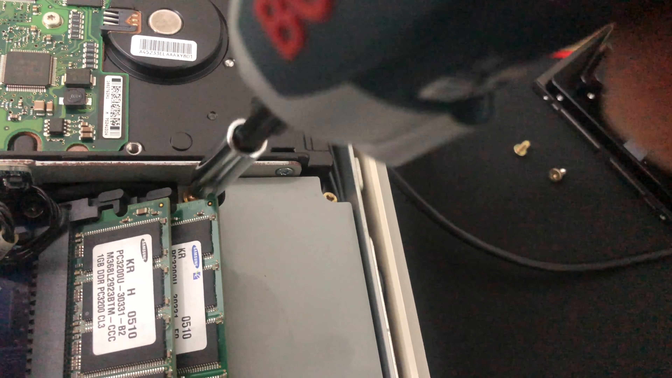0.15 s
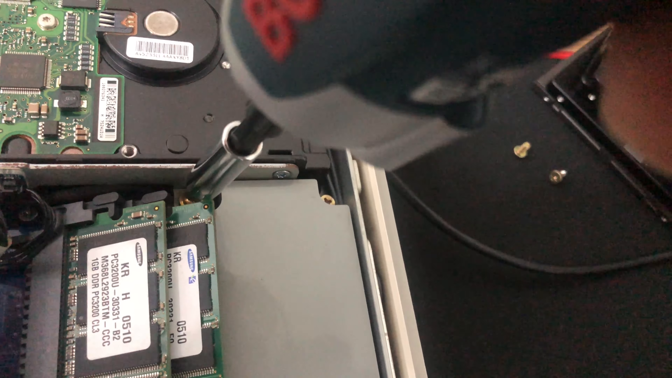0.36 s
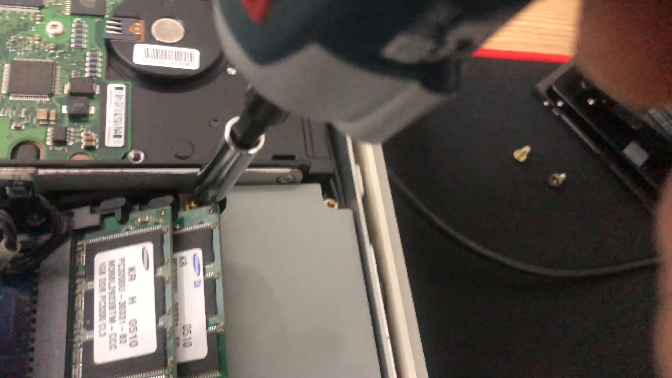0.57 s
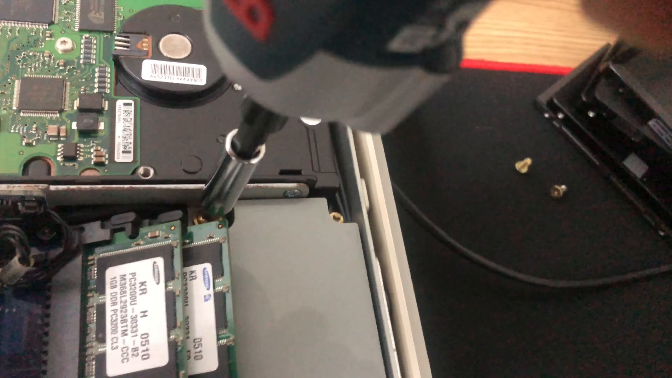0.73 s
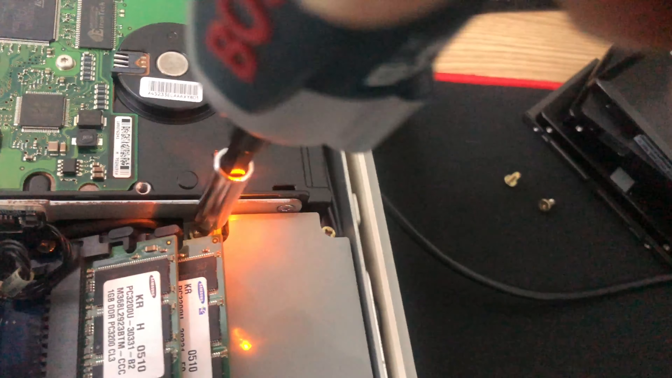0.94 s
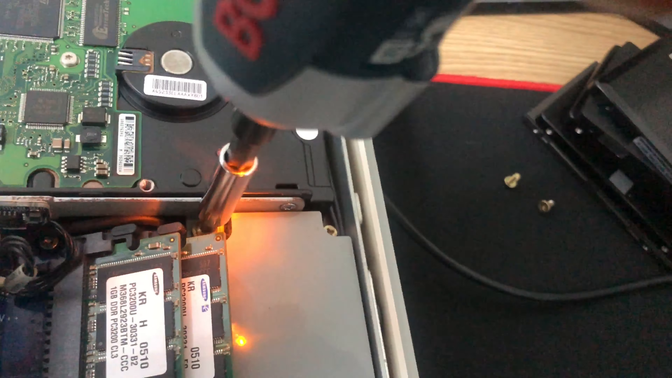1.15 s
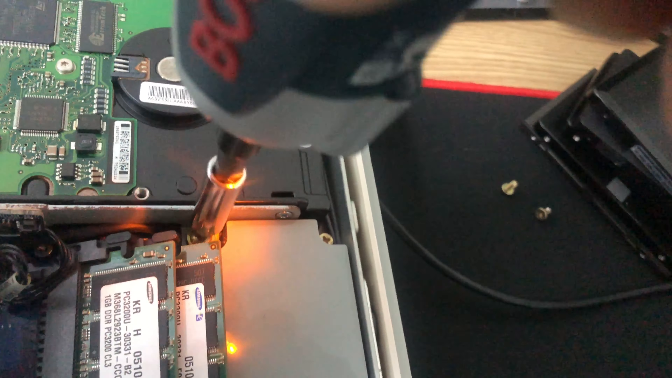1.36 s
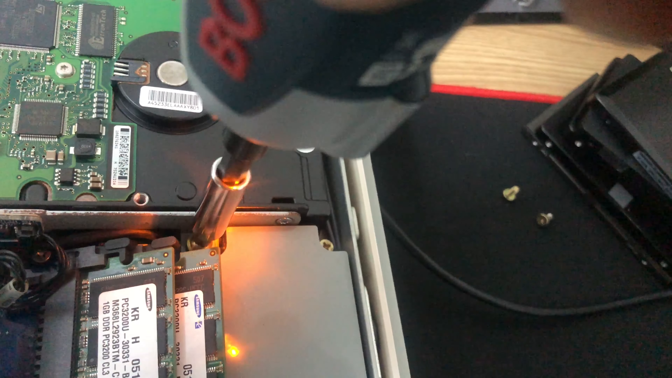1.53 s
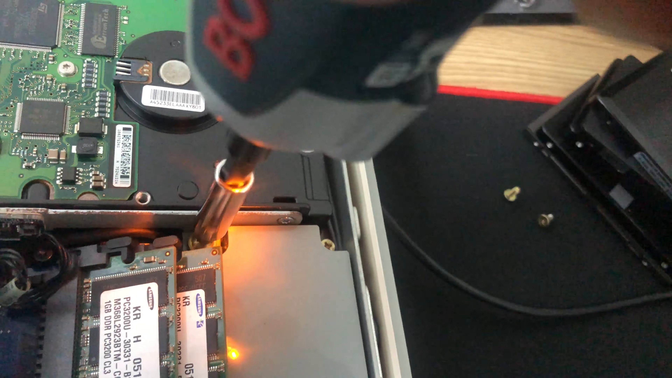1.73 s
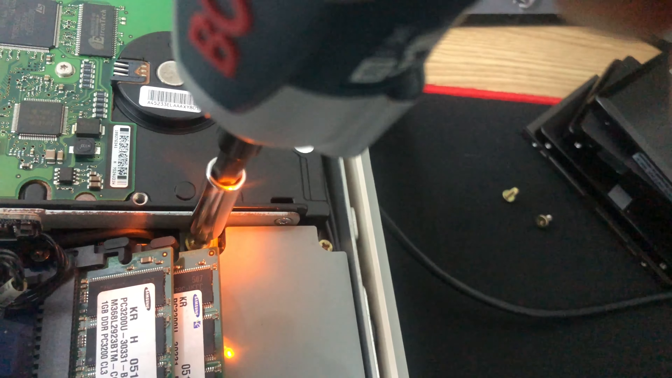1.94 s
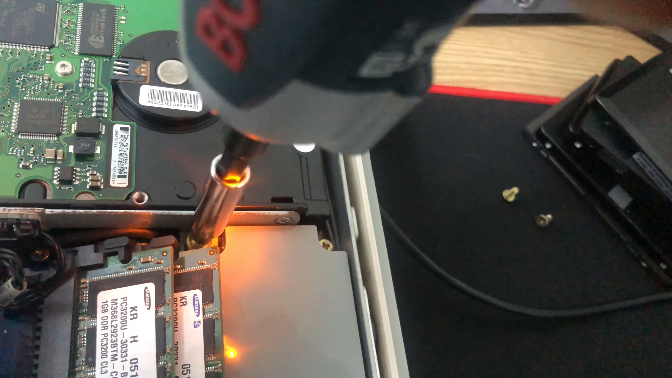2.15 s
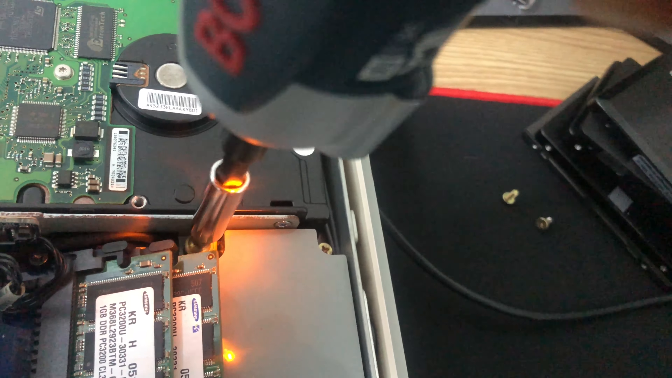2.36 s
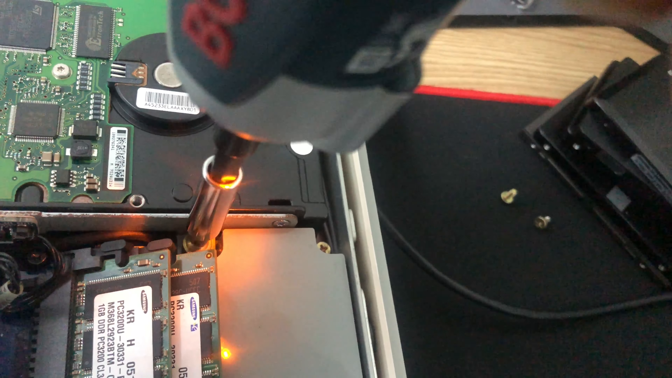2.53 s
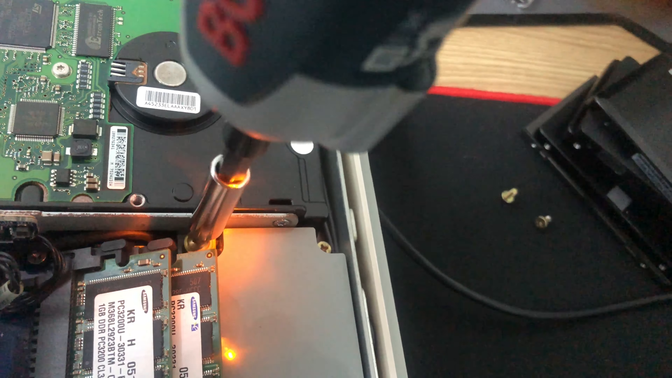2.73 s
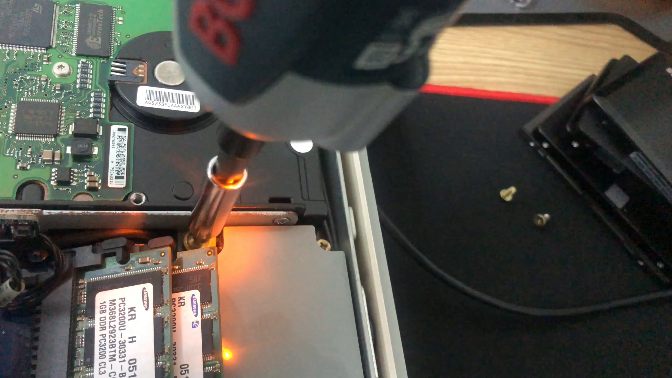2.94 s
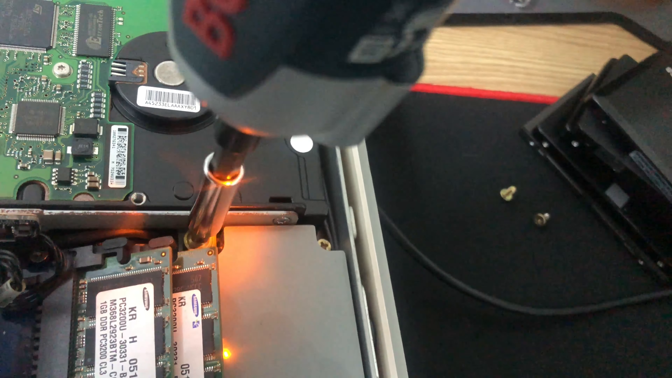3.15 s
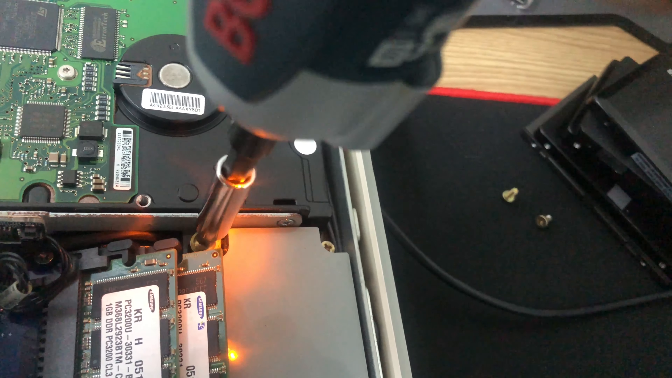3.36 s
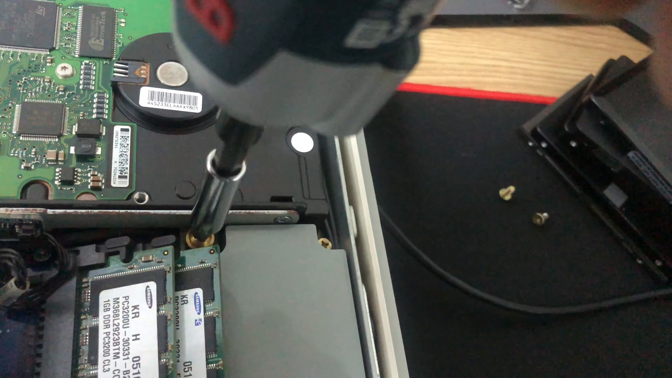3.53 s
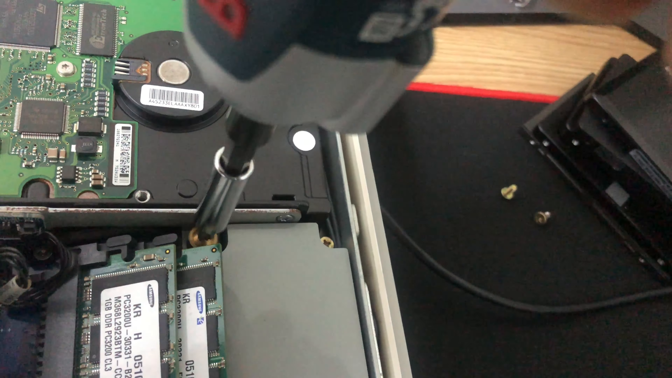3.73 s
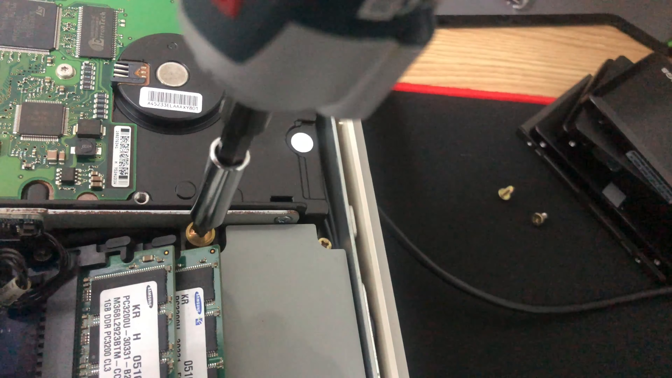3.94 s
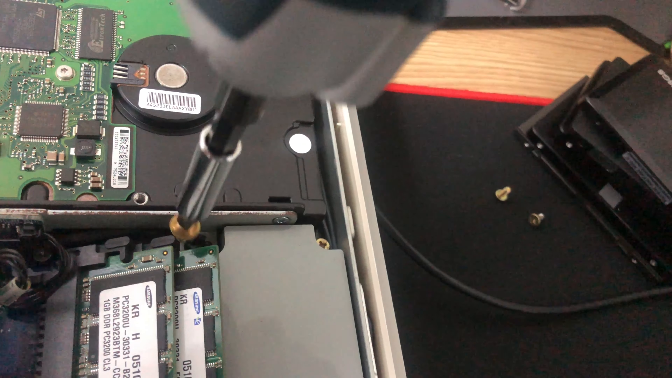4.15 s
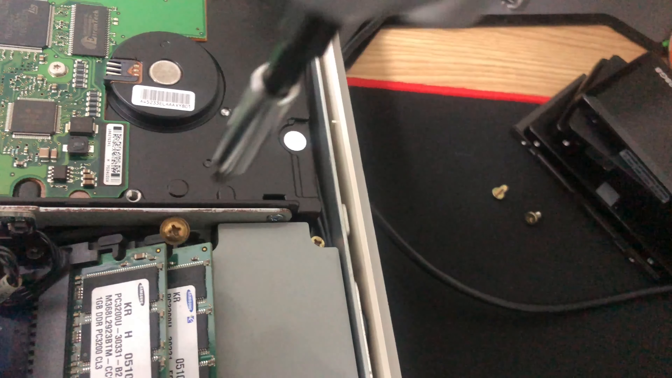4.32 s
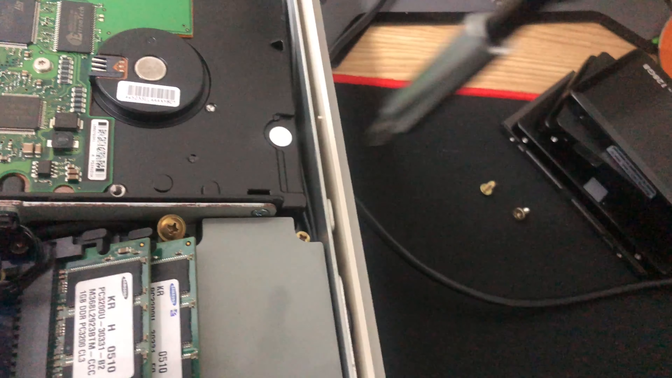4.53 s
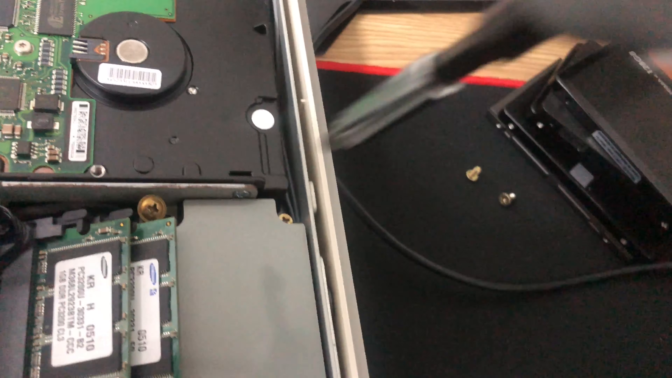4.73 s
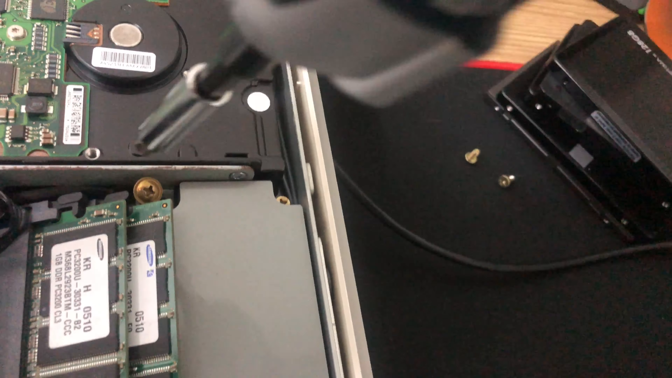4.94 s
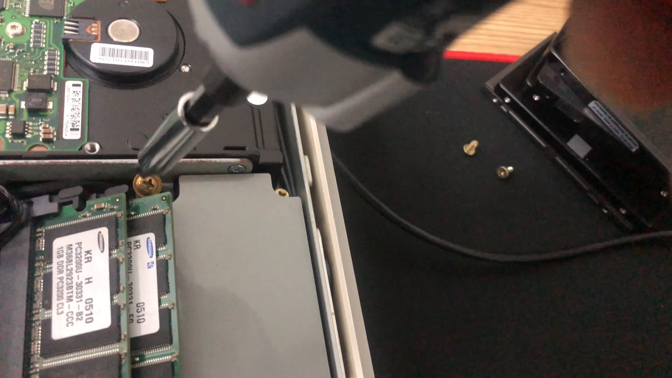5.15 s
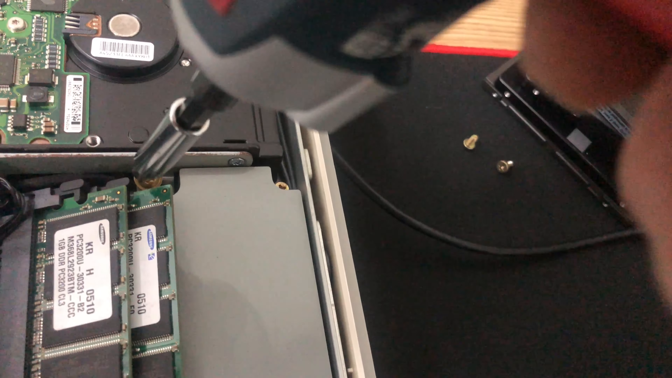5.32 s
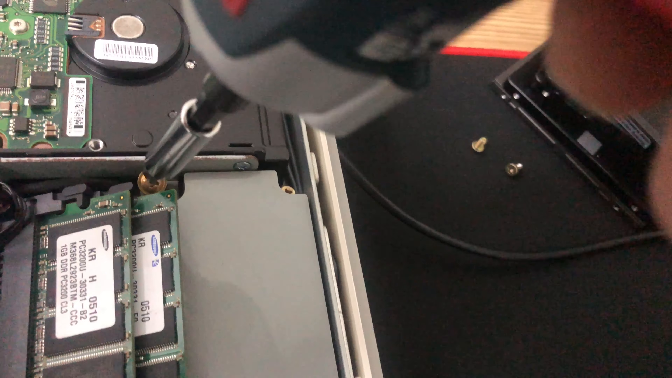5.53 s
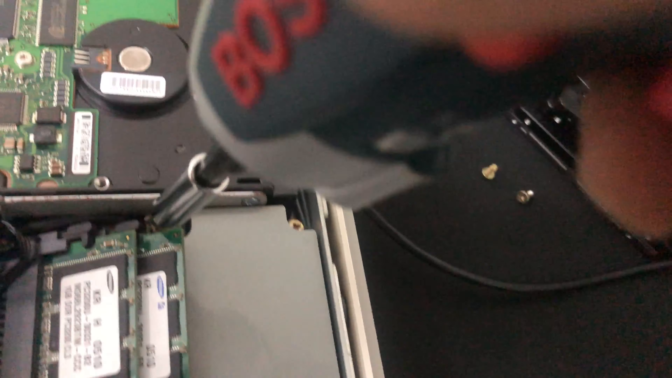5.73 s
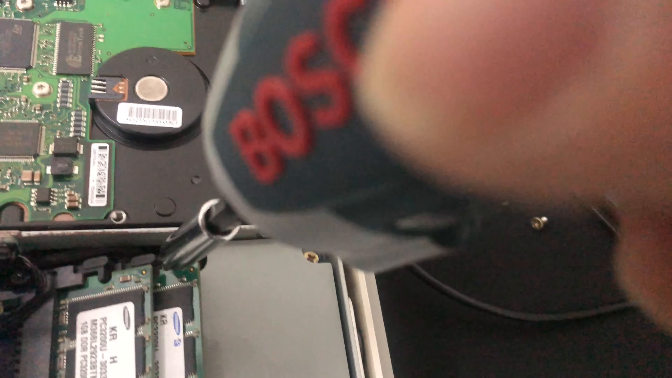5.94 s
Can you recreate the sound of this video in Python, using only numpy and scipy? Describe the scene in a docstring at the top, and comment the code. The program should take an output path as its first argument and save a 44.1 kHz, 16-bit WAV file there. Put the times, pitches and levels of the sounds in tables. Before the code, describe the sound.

Light metal taps, then a small electric screwdriver runs with a steady gear whine, coasts to a stop, and a screw drops.

```python
"""A small cordless screwdriver backs a screw out of an open computer chassis, close by.
First the bit clicks into the screw head and the trigger snaps: impacts that ring the chassis.
At 1 s the motor spins up; its planetary gears chatter in their resonant housing and shaft harmonics
whine. The thread lets go near 3 s, the current is cut at 3.5 s, and the motor coasts to a stop.
Last, the screw drops and bounces and the bit taps about, in a quiet room where a fan hums."""
import sys
import numpy as np
from scipy import signal
from scipy.fft import rfft, irfft, next_fast_len
from scipy.io import wavfile
from scipy.ndimage import uniform_filter1d, map_coordinates

SR = 44100
rng = np.random.default_rng(int(sys.argv[2]) if len(sys.argv) > 2 else 0)


def file_out(sig):
    """Save sig as 16-bit WAV at sys.argv[1]."""
    # one column per channel
    cols = np.atleast_2d(sig).T
    # limit, then scale
    lim = np.clip(cols, -1, 1)
    pcm = np.round(lim * 32767).astype(np.int16)
    wavfile.write(sys.argv[1], SR, pcm)


N = 268128
TIME = np.arange(N) / SR
ON_S, OFF_S, REST_S = .964, 3.49, 4.1  # trigger pressed, trigger released, shaft at rest
FULL_HZ, SPIN_UP_S, COAST_S = 268.3, .035, .78  # no-load shaft speed and its time constants


def screwdriver():
    """Rotating machinery: one shaft angle, the integral of speed, times gear impacts and motor tones."""
    speed_hz, tight, loose, free = shaft()
    running = np.clip((TIME - ON_S) / .002, 0, 1) * np.clip((REST_S - TIME) / .03, 0, 1)
    turns = np.cumsum(running * speed_hz * (1 + .0005 * wobble(18))) / SR
    tones = drive_tones(turns, speed_hz, tight, loose) + cogging(turns, speed_hz, tight, free)
    tones += whine(turns, speed_hz, loose) + bit_squeak(speed_hz, free)
    chatter = gear_housing(tooth_force(turns, running, loose, free), free)
    return swell(chatter, running, gear_levels(turns, speed_hz, loose, free)) + running * tones


# The screw binds about once a turn, ever less: (t/s, half width/s, speed lost/Hz)
BINDS = [(1.135, 0.047, 42.939), (1.203, 0.098, 21.222), (1.564, 0.058, 8.71), (1.905, 0.086, 6.165),
         (2.223, 0.099, 3.191), (2.512, 0.096, 2.98), (2.834, 0.109, 3.083)]

def shaft():
    """Inertia and friction set the speed; tight, loose (screw) and free (coasting) are 0-1 weights."""
    drag_hz, ease_s = 8.0, .86  # thread friction
    driven_s, coasted_s = np.maximum(TIME - ON_S, 0), np.maximum(TIME - OFF_S, 0)
    tight = np.exp(-driven_s / ease_s)
    loose = .5 + .5 * np.tanh((TIME - 2.95) / .1)  # the thread lets go
    speed_hz = FULL_HZ * (1 - np.exp(-driven_s / SPIN_UP_S)) - drag_hz * tight - humps(BINDS)
    slowed = np.minimum((1 - np.exp(-coasted_s / COAST_S)) / (1 - np.exp((OFF_S - REST_S) / COAST_S)), 1)
    free = np.clip(.06 + 1.45 * slowed, 0, 1)
    return np.maximum(speed_hz * (1 - slowed), 0), tight, loose, free


# Resonances of the slack parts: (f/Hz, bandwidth/Hz, level/dB)
SLACK_MODES = [(3380, 350, -5), (4270, 800, -4)]

def tooth_force(turns, running, loose, free):
    """Friction and impact excitation: teeth slide, a worn planet tooth knocks, slack parts rattle."""
    planet_ratio = .589
    knock = impacts(turns * planet_ratio, scatter_db=1.5, jitter_s=.00006, t60=.0087, snap=.33)
    rattle = impacts(turns, scatter_db=6.5, jitter_s=.0002, t60=.012, snap=.15)
    # blows of finite hardness carry the middle of the spectrum, sliding teeth fill the rest
    knock = unit(filtered(knock, lambda hz: band(hz, 1500, 11000, order=1)))
    rattle = unit(filtered(rattle, lambda hz: band(hz, 2000, 8000, order=1) * peaks(SLACK_MODES, hz)))
    sliding = amp(2.5) * rng.standard_normal(N)
    knock *= amp(-4.5 - 4.5 * loose + 9.8 * free + crunch_db())
    rattle *= amp(-7 + 4 * loose - 3 * free)
    return (sliding + knock + rattle) * running * amp(.6 * wobble(45))


def impacts(turns, scatter_db, jitter_s, t60, snap):
    """A quasi-periodic impulse train, rms 1: each turn a hard snap and a decaying spray of rebounds."""
    onsets = np.flatnonzero(np.diff(np.floor(turns)))
    size, late = rng.standard_normal((len(onsets), 2)).T
    onsets = np.clip(onsets + late * jitter_s * SR, 0, N - 1).astype(int)
    blows = np.bincount(onsets, amp(scatter_db * np.minimum(size, 1.3)), N)
    decay = signal.lfilter([1], [1, -amp(-60 / (t60 * SR))], blows)
    spray = decay * rng.standard_normal(N)
    return unit(unit(spray) + snap * unit(blows))


# The teeth crunch harder for a moment: (t/s, boost/dB)
CRUNCHES = [(1.075, 1.5), (1.215, 3), (1.31, 1.5), (1.52, 2.5), (1.785, 1.5), (1.84, 2.5), (1.94, 2.5),
            (2.26, 2), (2.45, 1), (2.8, 1.5), (2.86, 3.3), (3.33, 2.3)]

def crunch_db():
    """Transient loading: brief extra force on the teeth, in dB."""
    return humps((s, .02, db) for s, db in CRUNCHES)


# Spectral envelope of the gearbox: (f/Hz, level/dB)
GEAR_SPECTRUM = [(100, -29.5), (250, -15), (420, -14.5), (600, -11.5), (900, -5), (1700, -2), (2750, -7.5),
                 (4500, -4), (6500, -1), (9000, -2), (11000, -6), (13000, -6.5), (16000, -18.5)]
# Resonances of the gear housing: (f/Hz, bandwidth/Hz, level/dB)
HOUSING_MODES = [(1080, 270, -17), (1513, 290, -8), (2200, 290, -11), (3140, 210, -5.5), (3380, 100, -7.5),
                 (4202, 430, -9.5), (5364, 150, -14), (6250, 1000, -20), (7200, 250, -16.5),
                 (8200, 250, -18), (9900, 120, -19), (11350, 200, -7.5), (13200, 400, -15),
                 (13470, 400, -13), (14550, 350, -9.5)]
# Spectrum of unloaded gears relative to loaded ones: (f/Hz, gain/dB)
COAST_SPECTRUM = [(300, -6.5), (700, 2), (1080, 2.5), (1500, -5), (3000, 4.5), (5000, 9.5), (7000, 1),
                  (10000, 5.5), (16000, 1)]

def gear_housing(force, free):
    """Forced vibration: the housing's modes filter the tooth force, and stand out more when coasting."""
    loaded = filtered(force, lambda hz: amp(along(GEAR_SPECTRUM, hz)) * peaks(HOUSING_MODES, hz))
    unloaded = filtered(loaded, lambda hz: amp(along(COAST_SPECTRUM, hz)) * peaks(HOUSING_MODES, hz)**.73)
    return (1 - free) * unit(loaded) + free * unit(unloaded)


# Gear noise in the housing, mesh and fizz bands:
# (level/dB, exponent of effort, change when loose/dB, change when coasting/dB, starting jolt/full effort)
GEAR_BANDS = [(-39, 1.2, -0.5, 6.7, 1.05), (-31, 1.58, -1.57, 6, 0.58), (-38, 2.35, -1.5, 10, 0.48)]

def gear_levels(turns, speed_hz, loose, free):
    """Power law: each band's gain grows with effort, the sum of speed, strain and a starting jolt."""
    strain, turns_per_swell = .3, 40.3  # two swells to a turn of the bit
    starting = np.exp(-np.maximum(TIME - ON_S, 0) / SPIN_UP_S)
    effort = (speed_hz + strain * humps(BINDS)) / FULL_HZ
    load_db = .5 * np.cos(2 * np.pi * (turns / turns_per_swell - .1014)) + crunch_db()
    return [(effort + jolt * starting) ** power * amp(db + load_db + loose_db * loose + coast_db * free)
            for db, power, loose_db, coast_db, jolt in GEAR_BANDS]


def swell(sound, running, levels):
    """Amplitude modulation: three bands are each levelled to unit power, then follow the load."""
    hz = np.fft.rfftfreq(N, 1 / SR)
    housing = 1 / (1 + (hz / 2350) ** 12)
    fizz = 1 - 1 / (1 + (hz / 9700) ** 16)
    smooth = lambda x: np.abs(uniform_filter1d(x, size=3600))
    out = np.zeros(N)
    for share, level in zip((housing, 1 - housing - fizz, fizz), levels):
        part = irfft(rfft(sound) * share, N)
        power = smooth(part ** 2) / (smooth(running) + 1e-6) + 1e-6 * np.mean(part ** 2)
        out += running * level * part / np.sqrt(power)
    return out


# Harmonics of the driven shaft: (order, relative level/dB)
SHAFT_HARMONICS = [(1, -8.5), (2, -1), (4, 2), (13, -2), (16, 1.5), (19, 4), (21, 1.5), (27, -1), (33, 2),
                   (48, -4.5), (51, -6), (52, -6.5)]

def drive_tones(turns, speed_hz, tight, loose):
    """Periodic forcing gives a harmonic series, here with amplitude rising as the cube of speed."""
    harmonics = sum(amp(db) * tone(turns, order) for order, db in SHAFT_HARMONICS)
    return harmonics * amp(-49.8 - 9.5 * tight - 3.5 * loose) * (speed_hz / FULL_HZ) ** 3


# Cogging of the three-slot armature: (order, relative level/dB)
COGGING_ORDERS = [(3, 0.65), (6, -1), (9, -1)]
# Radiation response of the shell: (f/Hz, gain/dB)
SHELL_RESPONSE = [(150, -26.5), (300, -10), (480, -4.5), (800, -1.5), (1130, 4.5), (1400, 1), (1600, 2.5),
                  (2000, -4.5), (2500, -8.5)]

def cogging(turns, speed_hz, tight, free):
    """Torque ripple: its harmonics glide through the shell's resonance as the speed changes."""
    knee_hz = 150  # the hum fades below this shaft speed
    hum = sum(amp(db + along(SHELL_RESPONSE, order * speed_hz)) * tone(turns, order)
              for order, db in COGGING_ORDERS)
    hum *= amp(-48.5 - 4 * tight) * np.tanh((speed_hz / knee_hz) ** 2)
    return hum * amp(2 * free * wobble(110))  # unloaded, the armature shudders in the backlash


# Shaft orders near a resonance: (order, resonance f/Hz, bandwidth/Hz, peak level/dB, change when loose/dB)
WHINE_ORDERS = [(1, 238, 14, -55.5, -5), (21, 5400, 150, -39, 0.5), (30, 8080, 450, -42.5, 1.8),
                (36, 9700, 650, -42, 1.3), (42, 11120, 190, -41.5, -5.5)]

def whine(turns, speed_hz, loose):
    """Resonance: an order swells as it nears a natural frequency, and dies once the current is cut."""
    release_s = .05
    current = np.exp(-np.maximum(TIME - OFF_S, 0) / release_s)
    out = np.zeros(N)
    for order, hz, width, db, loose_db in WHINE_ORDERS:
        gain = amp(db + loose_db * loose) * resonance(order * speed_hz, hz, width)
        out += gain * tone(turns, order, flutter_db=.4)
    return current * out


# Squeaks of the bit: (t/s, half width/s, level/dB)
SQUEAKS = [(1.08, .02, -33.5), (3.55, 0.033, -40)]

def bit_squeak(speed_hz, free):
    """Narrow-band resonance: one mode of the bit squeaks briefly and rings while the gears coast."""
    squeaks = humps((s, width, amp(db)) for s, width, db in SQUEAKS)
    coast_ring = amp(-42.5) * free * speed_hz / FULL_HZ
    return (squeaks + coast_ring) * resonant_noise([(5560, 280, 0)])


# Contacts of bit, screw and trigger: (t/s, knock level/dB, clack level/dB, tick level/dB)
CONTACTS = [(.061, -54, -53, -82), (.113, -64, -58.5, -66), (.170, -63, -50, -56),
            (.2654, -36.5, -33.5, -45), (.385, -41, -45, -72), (.545, -45, -46, -60.5),
            (.551, -42, -40.5, -35), (.5565, -38.5, -37, -38), (.679, -54, -73, -80),
            (.728, -52.5, -67, -67), (.745, -65, -57, -64.5), (.772, -66, -62, -82), (.8126, -46, -44, -44),
            (0.8172, -53, -52, -52), (.93, -54.5, -55, -66), (.9585, -55, -46.5, -39.5),
            (4.187, -61, -59, -73), (4.2, -53, -43, -38), (4.3606, -46.5, -44.5, -35),
            (4.378, -47, -47, -45.5), (4.397, -55, -52, -49), (4.408, -59, -50, -45),
            (4.417, -41, -39, -38), (4.45, -57, -59, -69), (5.709, -47.5, -57, -53), (5.72, -57, -60, -61),
            (5.86, -47, -35.5, -50), (5.899, -54, -38, -49.5)]
# Resonances of the chassis: (f/Hz, bandwidth/Hz, level/dB)
CHASSIS_MODES = [(600, 110, -5.5), (890, 130, -3.5), (1100, 100, -16), (1620, 350, 1), (2430, 450, -3.5),
                 (2940, 520, -4.5), (4460, 660, -6), (7230, 1200, -9), (10700, 400, -10)]

def clicks():
    """Impact excitation: each contact's chatter rings the chassis in three bands, the highest briefest."""
    out, t = np.zeros(N + SR), np.arange(SR // 8) / SR
    bands = [(450, 1300, .032), (1500, 5600, .022), (6500, 12000, .016)]
    for s, *levels_db in CONTACTS:
        for db, (low_hz, high_hz, t60) in zip(levels_db, bands):
            chatter = rng.standard_normal(len(t)) * amp(-60 * t / t60)
            hit = filtered(chatter, lambda hz: band(hz, low_hz, high_hz) * peaks(CHASSIS_MODES, hz))
            peak_rms = np.sqrt(uniform_filter1d(hit ** 2, size=128).max())
            out[round(s * SR):][:len(t)] += amp(db) * hit / peak_rms
    return out[:N]


# Dull bumps and short rings of the case and drive: (t/s, f/Hz, level/dB)
BUMPS = [(.171, 2600, -41), (.267, 271, -40), (.277, 124, -41), (.554, 182, -40.5), (.575, 110, -43),
         (.718, 910, -45), (.74, 130, -42.5), (.762, 90, -44.5), (.814, 2120, -35), (1.064, 135, -39.5),
         (4.239, 91, -42), (4.272, 3030, -44), (4.364, 605, -35), (5.735, 109, -47.5), (5.861, 4500, -28.5),
         (5.901, 1080, -48)]

def bumps():
    """Damped free vibration: each soft blow rings one mode, and higher modes die sooner."""
    out = np.zeros(N)
    for s, hz, db in BUMPS:
        age = np.maximum(TIME - s, 0)
        t60 = .125 * (100 / hz) ** .6
        attack = 1 - np.exp(-2 * hz * age)
        out += attack * amp(db - 60 * age / t60) * np.sin(2 * np.pi * hz * age)
    return out


# Ringing modes of the bit: (f/Hz, bandwidth/Hz, relative level/dB)
PING_MODES = [(3960, 50, 0), (4500, 320, -8.5), (5125, 120, -14.5)]

def bit_ping():
    """Exponential decay of noise in the bit's modes: one faint, rough ping."""
    start_s, attack_s, t60 = 5.522, .012, .64
    age = np.maximum(TIME - start_s, 0)
    return amp(-72 - 60 * age / t60) * np.minimum(age / attack_s, 1) * resonant_noise(PING_MODES)


# Soft rubs and faint swells of breathy hiss: (t/s, half width/s, level/dB)
HISS_SWELLS = [(.02, .12, -81), (.42, .15, -82), (.77, 0.08, -70), (4.3, .2, -85), (4.95, .15, -83),
               (5.75, .08, -85), (5.9, .025, -65)]

def soft_hiss():
    """Amplitude-modulated noise: a grainy mid-band hiss swells and fades."""
    grains = rng.standard_normal(N) * amp(2.2 * wobble(250))
    hiss = unit(filtered(grains, lambda hz: band(hz, 600, 4000, order=1)))
    return humps((s, width, amp(db)) for s, width, db in HISS_SWELLS) * hiss


# Spectrum of the room's air: (f/Hz, relative level/dB)
AIR_SPECTRUM = [(24, -35), (40, -8.5), (104, -2), (176, -8.5), (215, -3), (249, -12.5), (337, -7.5),
                (382, -12.5), (529, -12), (680, -25), (751, -16.5), (2050, -31.5), (2380, -34.5),
                (3830, -41), (16000, -51)]
# Tones of a fan: (f/Hz, level/dB)
FAN_TONES = [(214, -71), (320, -76.5)]

def air():
    """Ambient noise: a low broadband floor under a fan's phase-modulated tones."""
    noise = filtered(rng.standard_normal(N), lambda hz: amp(along(AIR_SPECTRUM, hz)) * band(hz, 39, 15000))
    fan = sum(amp(db) * unit(np.sin(2 * np.pi * hz * TIME + 1.2 * wobble(12))) for hz, db in FAN_TONES)
    return amp(-60) * unit(noise) + fan


# Reverberation time of the room: (f/Hz, T60/s)
ROOM_T60 = [(200, .35), (2000, 0.33), (12000, 0.17)]

def room(x):
    """Reverberation: convolution with a diffuse tail that starts 4 ms late and dies faster in the treble."""
    hz, t, spectra = signal.stft(rng.standard_normal(SR // 2), SR, nperseg=256)
    decay = amp(-60 * t / along(ROOM_T60, hz)[:, None])
    tail = signal.istft(spectra * decay, SR, nperseg=256)[1]
    response = np.pad(tail / np.linalg.norm(tail), (round(.004 * SR), 0))
    return signal.fftconvolve(x, response)[:N]


def amp(db):
    """Decibels to amplitude ratio."""
    return 10 ** (np.asarray(db) / 20)


def unit(x):
    """Normalisation to rms 1."""
    return x / np.sqrt(np.mean(x ** 2) + 1e-20)


def along(points, hz):
    """Interpolation of (f/Hz, value) points on a log frequency axis."""
    freqs, values = np.transpose(points)
    return np.interp(np.log(hz + 1), np.log(freqs + 1), values)


def wobble(rate):
    """Smooth random modulation, rate knots a second."""
    return map_coordinates(rng.standard_normal(int(N * rate / SR) + 4), [TIME * rate])


def humps(rows):
    """Sum of Gaussian pulses from rows (t/s, half width/s, height)."""
    return sum(height * np.exp(-((TIME - s) / width) ** 2) for s, width, height in rows)


def tone(turns, order, flutter_db=2):
    """One harmonic of the rotation, rms 1, fluttering slightly in amplitude and phase."""
    return unit(amp(flutter_db * wobble(30)) * np.sin(2 * np.pi * order * turns + .16 * wobble(20)))


def filtered(x, gain):
    """Minimum-phase filter of magnitude gain(hz), made causal by folding the cepstrum."""
    size = 2 * next_fast_len(len(x) // 2 + 4096)
    magnitude = np.maximum(gain(np.fft.rfftfreq(size, 1 / SR)), 1e-6)
    cepstrum = irfft(np.log(magnitude))
    cepstrum[1:size // 2] *= 2
    cepstrum[size // 2 + 1:] = 0
    return irfft(rfft(x, size) * np.exp(rfft(cepstrum)))[:len(x)]


def band(hz, low_hz, high_hz, order=4):
    """Magnitude response of a band-pass."""
    return ((1 + (low_hz / (hz + 1)) ** (2 * order)) * (1 + (hz / high_hz) ** (2 * order))) ** -.5


def resonance(hz, centre, width):
    """Resonance curve of height 1 and the given full width at half height."""
    return 1 / (1 + (2 * (hz - centre) / width) ** 2)


def peaks(modes, hz):
    """Modal superposition on top of a flat response."""
    return 1 + sum(2 * amp(db) * resonance(hz, centre, width) for centre, width, db in modes)


def resonant_noise(modes):
    """Random excitation of the given modes, rms 1."""
    gain = lambda hz: sum(amp(db) * resonance(hz, centre, width) for centre, width, db in modes)
    return unit(filtered(rng.standard_normal(N), gain))


def scene():
    """Superposition: strong direct sound of tool and contacts, weak reverberation, ambient noise."""
    direct = screwdriver() + clicks() + bumps() + bit_ping() + soft_hiss()
    return (direct + room(amp(-17.5) * direct) + air())[None]


def record(dry):
    """Band limiting by an ideal low-pass."""
    top_hz = 16200
    return irfft(rfft(dry) * (np.fft.rfftfreq(N, 1 / SR) < top_hz), N)


dry = scene()
out = record(dry)
file_out(out)
```